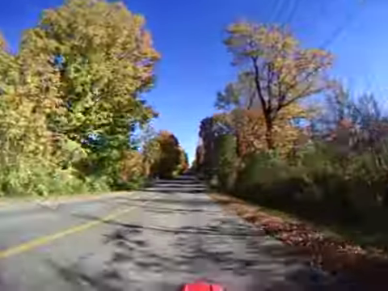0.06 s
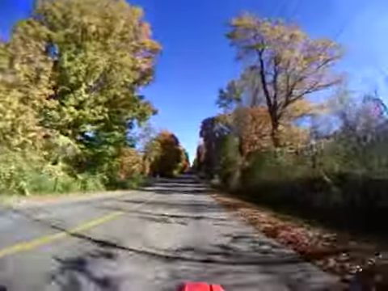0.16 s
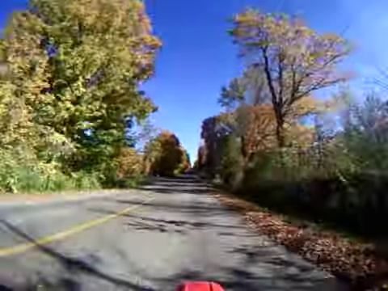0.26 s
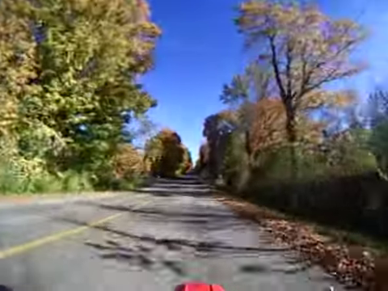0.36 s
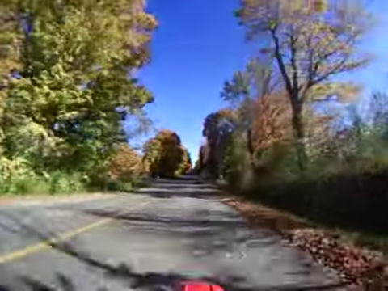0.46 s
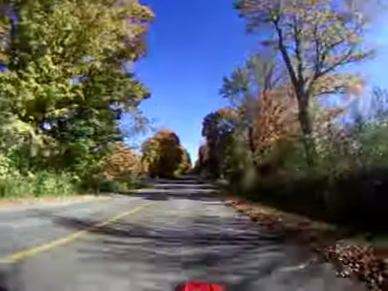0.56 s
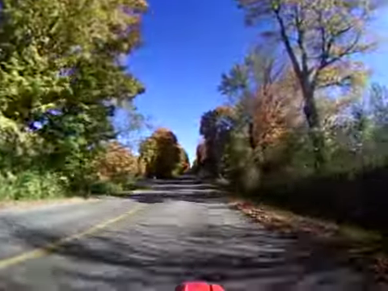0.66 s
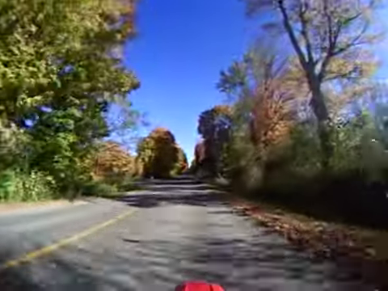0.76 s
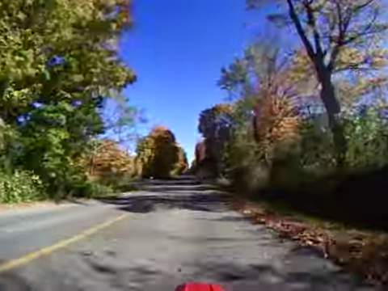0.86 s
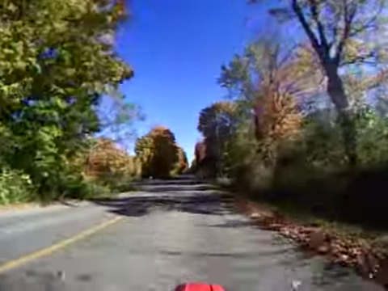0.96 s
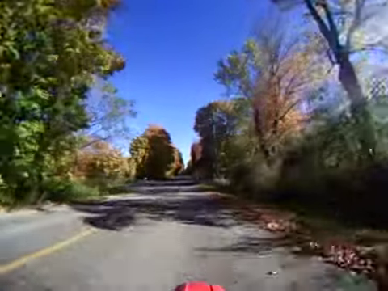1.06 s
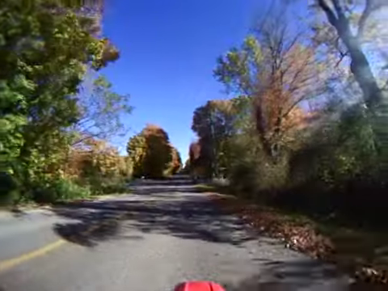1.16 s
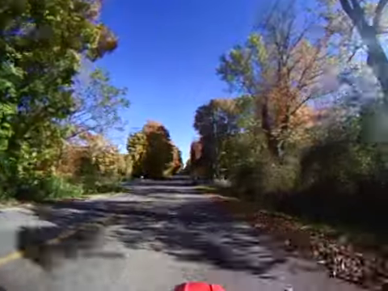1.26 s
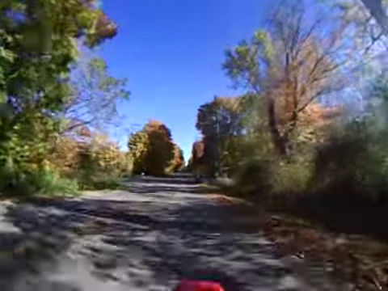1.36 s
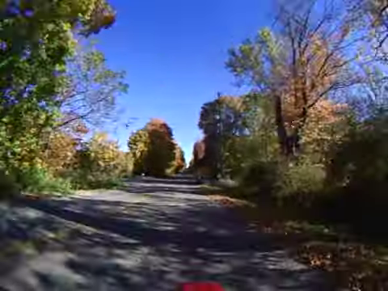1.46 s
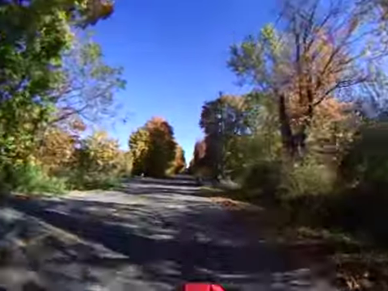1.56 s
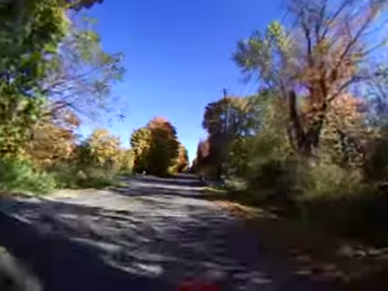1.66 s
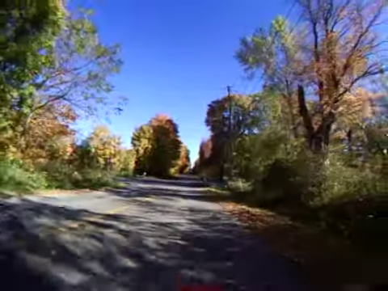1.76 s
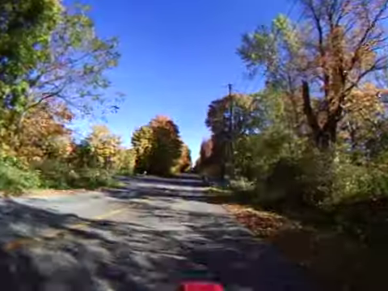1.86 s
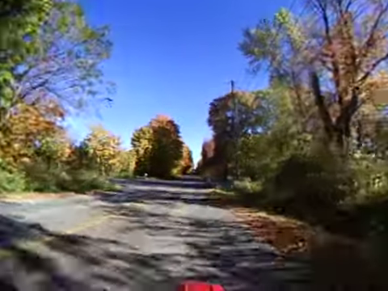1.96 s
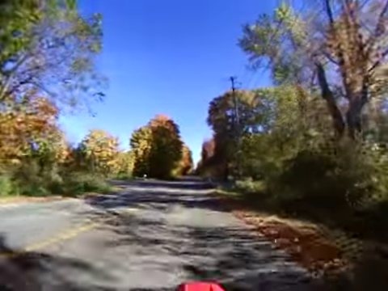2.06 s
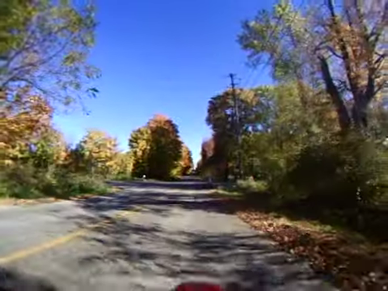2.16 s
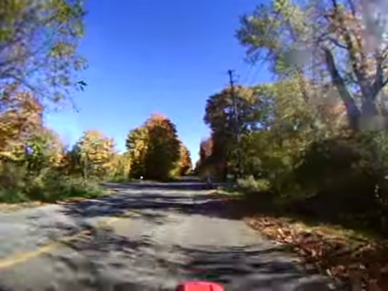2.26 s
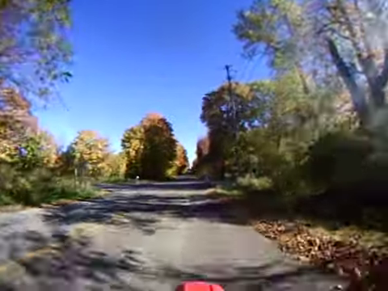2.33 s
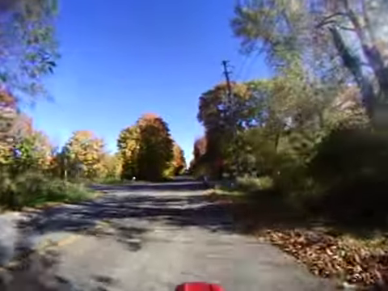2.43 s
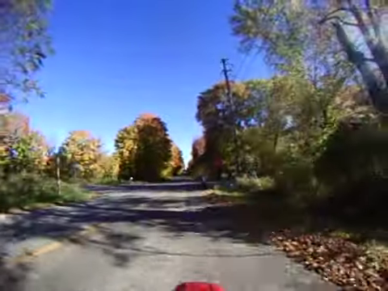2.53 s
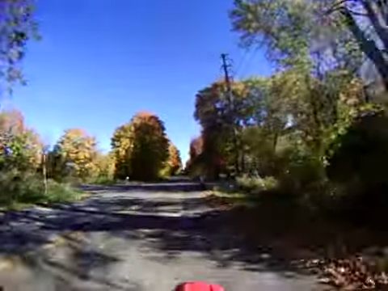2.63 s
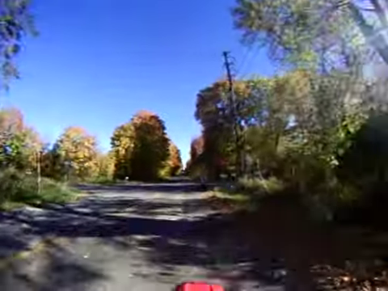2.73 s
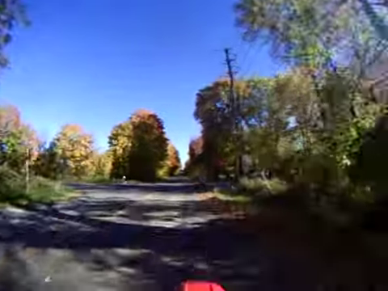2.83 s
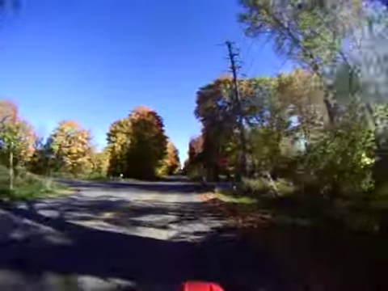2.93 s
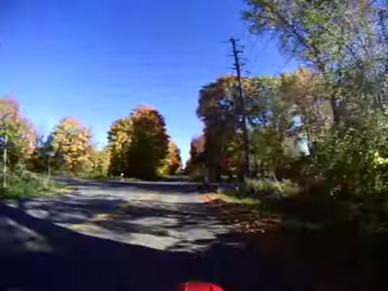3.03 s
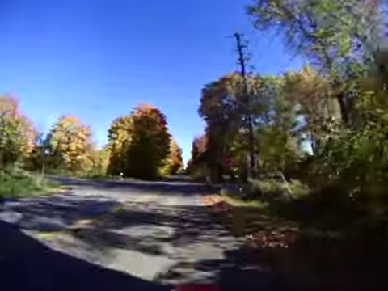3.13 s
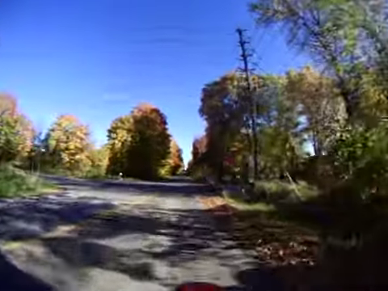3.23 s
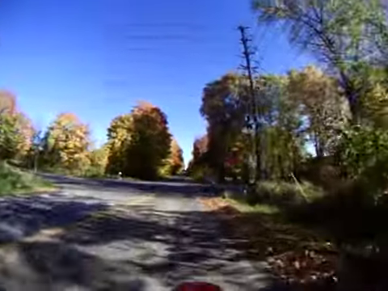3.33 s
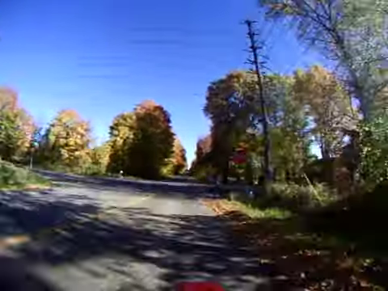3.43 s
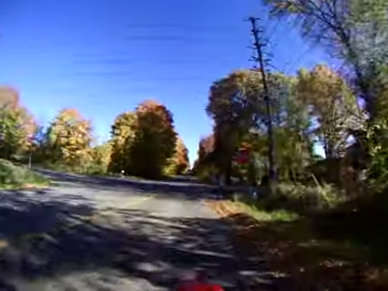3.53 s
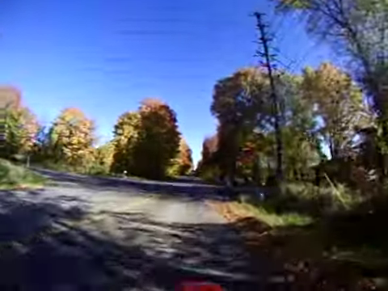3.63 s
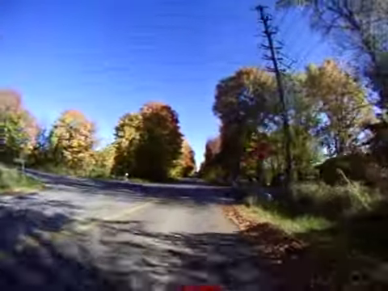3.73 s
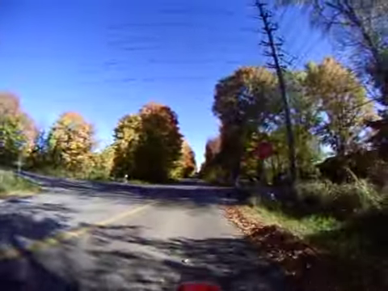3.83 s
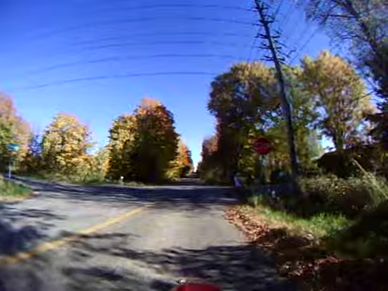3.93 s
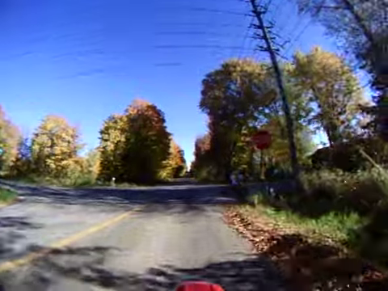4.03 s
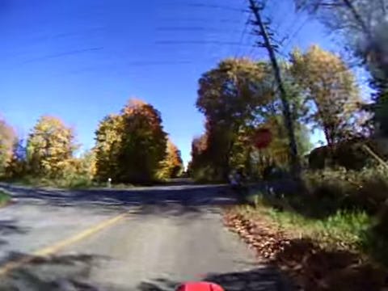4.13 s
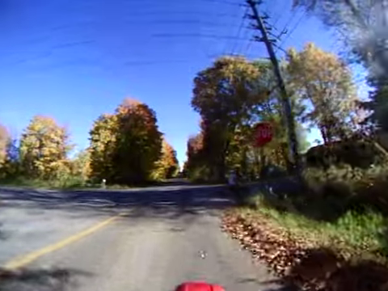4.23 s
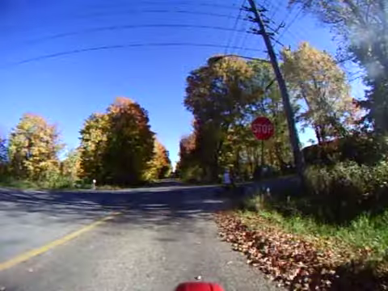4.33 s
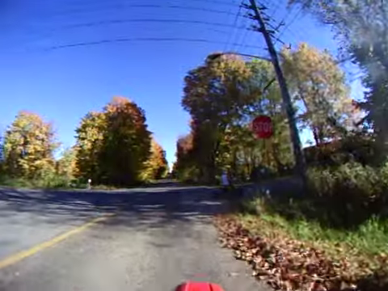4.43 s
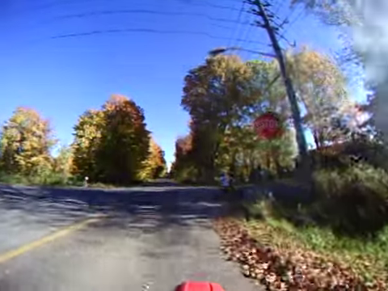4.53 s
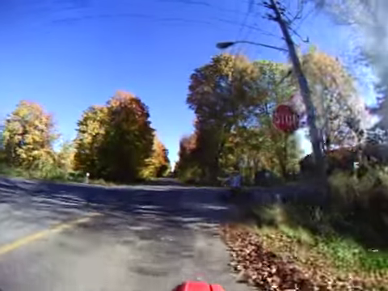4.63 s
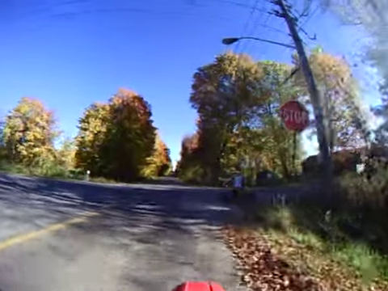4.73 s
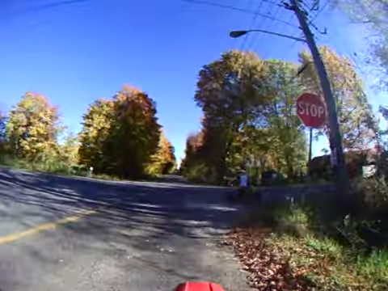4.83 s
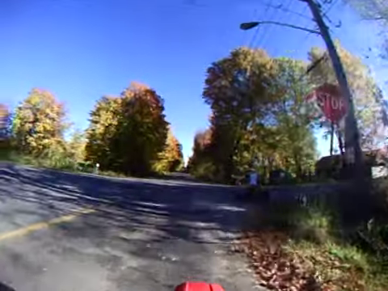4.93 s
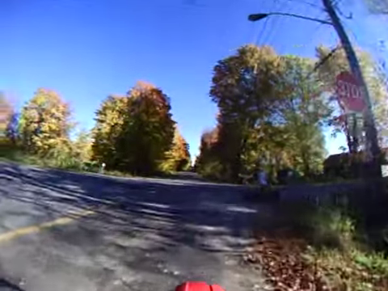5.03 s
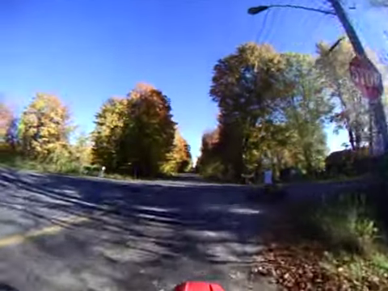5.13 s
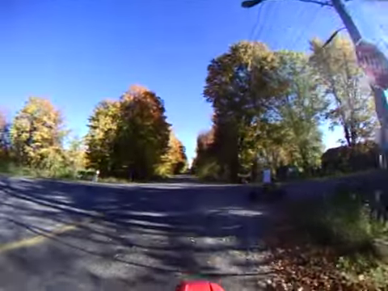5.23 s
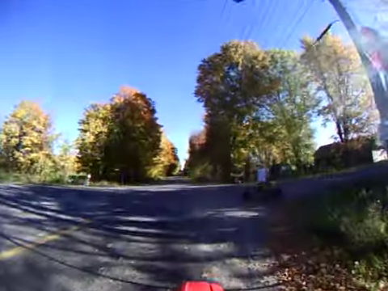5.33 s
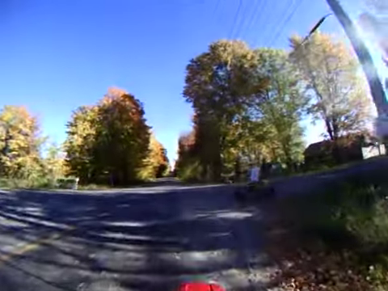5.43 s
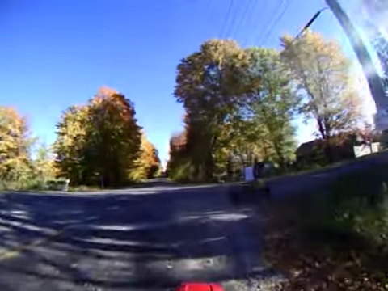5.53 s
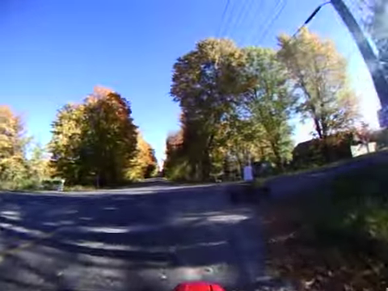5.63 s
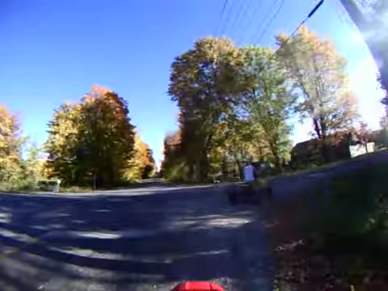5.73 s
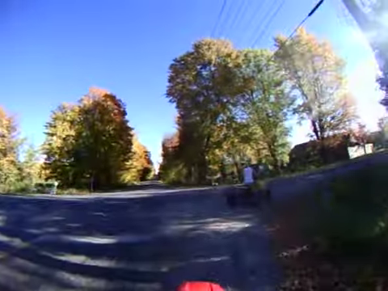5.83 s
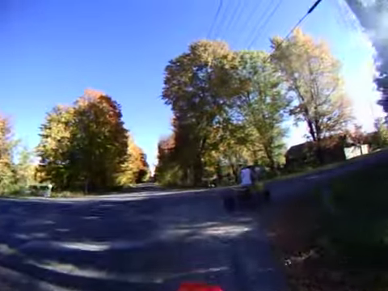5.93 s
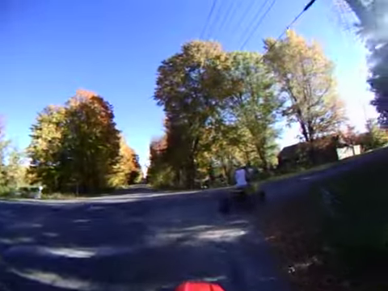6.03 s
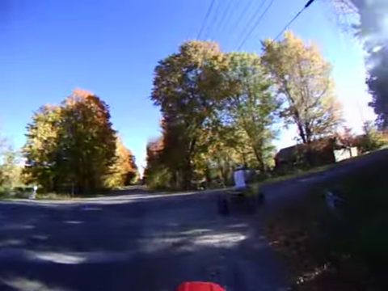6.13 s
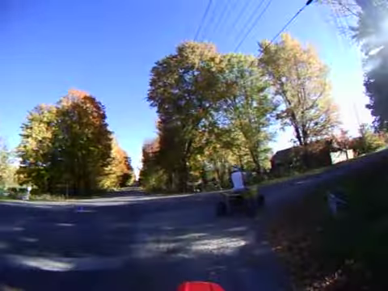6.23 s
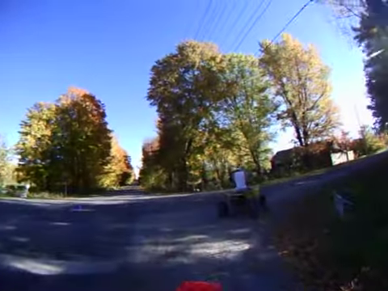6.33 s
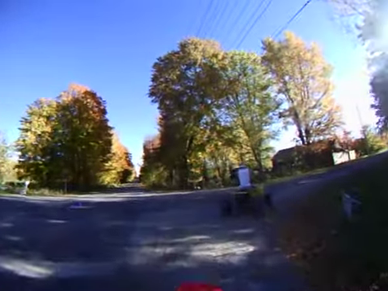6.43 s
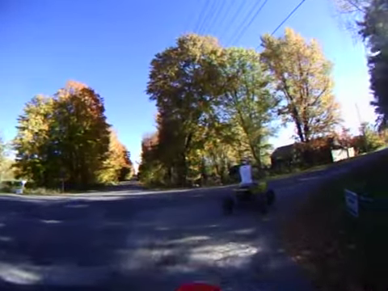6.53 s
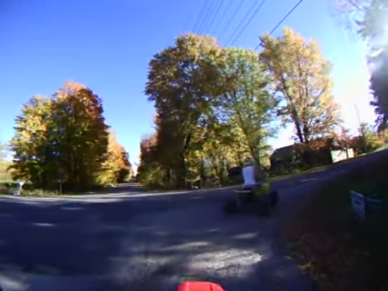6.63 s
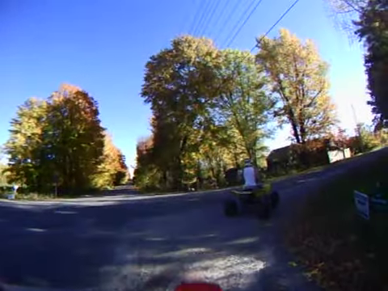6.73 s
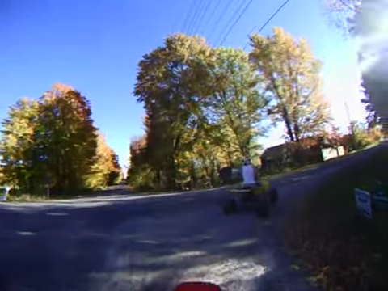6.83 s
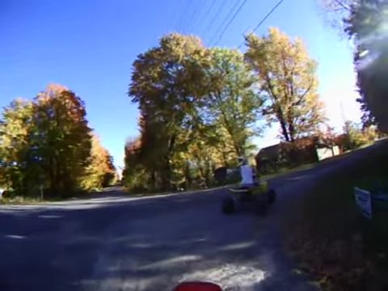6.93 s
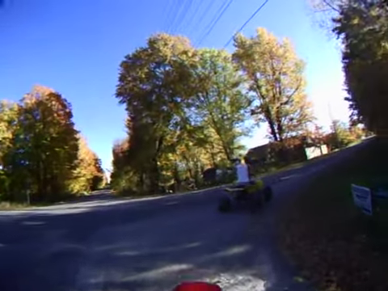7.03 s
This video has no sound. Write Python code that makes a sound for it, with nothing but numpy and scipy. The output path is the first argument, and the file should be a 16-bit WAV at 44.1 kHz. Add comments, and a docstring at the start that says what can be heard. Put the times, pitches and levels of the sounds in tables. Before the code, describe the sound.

Heard from on board, a dirt bike engine drones loudly and rasps as it overloads the microphone in two bursts of throttle. It then slows along the road, blipping twice with gear clacks and pipe pops, over faint low wind. The revs fall away to a soft, thumping idle with some chain rattle, before jumping sharply up again.

```python
"""Single-cylinder dirt bike, on board

Two hard pulls, two blips, a coast down to idle, a last stab. Engine speed and throttle drive the
airbox honk, silencer ring and engine clatter. The pipe pops, the gearbox clacks at each downshift,
the chain slaps at low speed. The honk overloads the narrow-band input of a small camera riding on
the bike, which rasps once or twice a crank turn."""
import sys
import numpy as np
from scipy import signal
from scipy.io import wavfile
from scipy.ndimage import uniform_filter1d

SR = 44100
rng = np.random.default_rng(int(sys.argv[2]) if len(sys.argv) > 2 else 0)


def file_out(sig):
    """Save sig as 16-bit WAV at sys.argv[1]."""
    # one column per channel
    cols = np.atleast_2d(sig).T
    # limit, then scale
    lim = np.clip(cols, -1, 1)
    pcm = np.round(lim * 32767).astype(np.int16)
    wavfile.write(sys.argv[1], SR, pcm)


N = 312228
TIME_S = np.arange(N) / SR
# Silencer resonances. Each row: frequency in Hz, width in Hz, gain in dB.
SILENCER_MODES = [(82.5, 22, -18), (134.8, 43, -4.5), (237.45, 65, -1.5), (302, 35, -21.5)]


def intake(turns, honk_db):
    """Each soft gulp of air rings the airbox; the charge varies, so the honk is ragged."""
    gulps = -pulses(turns, phase=0, scatter_db=1.34, jitter_s=.00002)
    soft = butter(butter(gulps, 33, "low"), 33, "low")
    airbox = ring(soft, [(145, 21, 0)])
    ragged_db = .6 * slow_noise(25)
    return steady(airbox) * undb(honk_db + ragged_db)


def throttle():
    """Honk gain: each twist rises linearly, holds, then rolls off."""
    # Each row: opening time, rise time, easing time, fall time, all in seconds, honk level in dB.
    twists = [(-.2, .1, 0.28, 0.2, -1), (.4, 0.044, .51, 0.04, -7), (.55, 0.062, .66, .03, -9),
              (1.111, .1, 1.24, 0.21, -6), (1.26, .1, 1.73, .175, 1.5), (2.85, 0.078, 2.95, .03, -16.5),
              (2.95, 0.1, 3.15, 0.29, -21.5), (4.39, 0.058, 4.64, 0.037, -29), (6.9, .14, 9.2, 0.075, -21)]
    honk = np.full(N, 1e-4)
    for opens_s, rise_s, eases_s, fall_s, db in twists:
        rise = np.clip((TIME_S - opens_s) / rise_s, 0, 1)
        fall = np.exp(-(np.maximum(TIME_S - eases_s, 0) / fall_s) ** 2)
        honk = np.maximum(honk, undb(db) * rise * fall)
    return honk


def engine_speed():
    """Engine pitch in Hz (crank turns per second): jumps at each downshift, sags while coasting."""
    # In gear, then clutch in. Each row: time in seconds, engine pitch in Hz.
    in_gear = [(0.0, 89.2), (0.21, 88.3), (0.63, 79.94), (0.78, 78.55), (1.05, 72.64), (1.14, 81.36),
               (1.52, 88.33), (2.59, 69.9), (2.8, 65.22), (2.89, 76.23), (2.93, 79.5), (3.17, 79.16),
               (3.43, 74.72), (4.33, 57.2), (4.45, 76.63), (4.48, 80.0), (4.54, 75), (5.4, 41.77)]
    clutch_in = [(5.502, 37), (5.8, 31), (6.197, 25), (6.898, 17), (7.002, 11), (7.08, 89)]
    return curves(list(in_gear) + list(clutch_in), TIME_S)[0]


def exhaust(turns, engine_hz, level_db):
    """Uneven exhaust beats and turbulent gas ring the silencer; the gas share grows at low revs."""
    beats = steady(pulses(turns, phase=.56, scatter_db=3.0, jitter_s=.0001))
    beats *= 1 + .45 * np.cos(np.pi * (turns - .56))  # strong and weak beats alternate
    gas = (25 / engine_hz) ** 2 * rng.standard_normal(N)
    flow = butter(beats + gas, 262, "low", order=10)
    return steady(ring(flow, SILENCER_MODES)) * undb(level_db + 1.77)


def bark(honk, max_db=11, halfway_honk_db=-18, linger_s=0.093):
    """Silencer boost in dB on throttle; lingers after the throttle eases."""
    fuel = np.maximum(honk, butter(honk, 1 / (2 * np.pi * linger_s), "low"))
    return max_db * fuel / (fuel + undb(halfway_honk_db))


def crank(turns, engine_hz, level_db):
    """The piston pumps twice a turn: a wavering hum that breaks into rumble at low revs."""
    waver_db = 1.4 * slow_noise(40)
    hum = np.sqrt(2) * np.cos(4 * np.pi * (turns - .57)) * undb(waver_db)
    hum -= undb(-18 + 2 * waver_db) * np.sin(2 * np.pi * turns)  # unequal strokes
    band = [(130, 390, 0)]
    rumble = steady(ring(ring(rng.standard_normal(N), band), band))
    hum_share = 1 / (1 + (49 / engine_hz) ** 16)
    # the frame shakes as the revs pass its resonance
    shake = np.sin(2 * np.pi * turns) * undb(-25) / (1 + ((engine_hz - 46) / 6) ** 4)
    return (hum_share * hum + (1 - hum_share) * rumble) * undb(level_db) + shake


def clatter(turns, engine_hz, level_db):
    """One knock a turn, harder with revs, and a rustle of valves and gears ring the case."""
    # Case and frame resonances. Each row: frequency in Hz, width in Hz, gain in dB.
    case_modes = [(562.5, 18, 6), (622.9, 70, 6), (712.7, 70, 0.5), (904, 96, -7.5), (1190.5, 220, -0.5),
                  (1291, 89, -2.5), (1519, 95, -6), (2011, 590, -4), (2287, 140, -2.5), (2523, 120, -2.5),
                  (2909, 140, -0.5), (3040, 38, -13.5), (3444, 480, -3)]
    knocks = steady(pulses(turns, phase=.6, scatter_db=-0.5, jitter_s=.00004)) * engine_hz / 70
    swell_db = 1.5 * np.cos(4 * np.pi * turns) + 1.9 * np.cos(2 * np.pi * (turns - .7))
    rustle = unit(rng.standard_normal(N) * undb(swell_db))
    drive = 1.4 * butter(knocks, 850, "low") + 0.98 * rustle
    body = butter(ring(drive, case_modes), 455, "high", order=3)
    # slow parts strike softly: less treble towards idle
    dull = np.clip(1 - engine_hz / 60, 0, 1)
    body += 5.9 * dull * butter(body, 520, "low")
    return steady(body) * undb(level_db + 6.5 + 2.0 * dull)


def exhaust_pops():
    """Sharp cracks from the pipe as the throttle opens."""
    # Each row: start in seconds, relative level in dB.
    pops = [(1.094, -5.5), (1.12, -10), (1.148, -12.5), (2.828, -10.5), (2.882, -11.5), (2.909, -15.5),
            (4.347, -14.5), (4.379, -11.5), (4.408, -9), (4.437, -15.5), (6.927, -20.5), (6.988, -14.5),
            (7.029, -14.5)]
    # Each row: frequency in Hz, width in Hz, gain in dB.
    crack_modes = [(143, 120, -12.5), (598, 140, 9.5), (1210, 220, 3.5), (1720, 900, -11), (2410, 960, -12),
                   (3170, 880, -13.5)]
    return undb(-4.0) * bursts(pops, crack_modes, rise_s=0.0012, decay_s=0.0079)


def idle_thumps():
    """Dull single firings ring the silencer at low revs."""
    # Each row: start in seconds, relative level in dB.
    thumps = [(5.435, -13.5), (5.486, -18), (5.924, -19), (6.156, -21), (6.758, -18.5), (6.916, -13),
              (6.985, -9), (7.03, -9.5)]
    ringing = bursts(thumps, SILENCER_MODES, rise_s=0.0016, decay_s=0.0063)
    return undb(-3.5) * butter(ringing, 289.4, "low", order=4)


def gear_clacks():
    """Gear changes ring the gearbox."""
    # Each row: start in seconds, relative level in dB.
    clacks = [(1.0095, -14), (1.0375, -10.5), (2.7432, -12.5), (4.2935, -16.5), (4.3171, -9.5)]
    # Each row: frequency in Hz, width in Hz, gain in dB.
    gearbox_modes = [(1250, 320, -5.5), (2356.4, 200, -1.5), (2925.6, 350, -1.5), (3290, 290, -4.5)]
    return undb(-2.5) * bursts(clacks, gearbox_modes, rise_s=0.0037, decay_s=0.0066)


def chain_slaps():
    """Slaps at low speed ring the chain and its guide."""
    # Each row: start in seconds, relative level in dB.
    slaps = [(4.6957, -20), (4.892, -23), (5.8676, -23), (6.0462, -28.5), (6.095, -31.5), (6.5125, -31.5),
             (6.6019, -29), (6.6962, -16.5), (6.8548, -32.5)]
    # Each row: frequency in Hz, width in Hz, gain in dB.
    chain_modes = [(1200, 280, -7), (2320, 520, -2.5), (2450, 73, -5.5), (2960, 360, -9.5),
                   (3244, 31, -1.5)]
    return undb(-3) * bursts(slaps, chain_modes, rise_s=.002, decay_s=.004)


def wind(clatter_db):
    """Low air buffeting; rises and falls with the revs, via the clatter level."""
    air = butter(rng.standard_normal(N), 76, "low", order=2)
    return unit(butter(air, 12, "high")) * undb(-16.5 + .5 * clatter_db)


def pulses(turns, phase, scatter_db, jitter_s):
    """One pulse per crank turn at the given phase (0 to 1), random in size and timing."""
    draws = rng.standard_normal((int(turns[-1]), 2))
    at_s = np.interp(np.arange(len(draws)) + phase, turns, TIME_S) + jitter_s * draws[:, 0]
    out = np.zeros(N)
    np.add.at(out, np.clip(at_s * SR, 0, N - 1).astype(int), undb(scatter_db * draws[:, 1]))
    return out


def bursts(events, modes, rise_s, decay_s):
    """A short noise push into resonances per event, scaled by its loudest 5 ms."""
    out, t = np.zeros(N + SR), TIME_S[:SR // 8]
    for start_s, db in events:
        push = rng.standard_normal(len(t)) * (1 - np.exp(-t / rise_s)) * np.exp(-t / decay_s)
        hit = ring(push, modes)
        peak_rms = np.sqrt(np.max(uniform_filter1d(hit ** 2, size=SR // 200)))
        out[int(start_s * SR):][:len(t)] += undb(db) * hit / peak_rms
    return out[:N]


def ring(x, modes):
    """Parallel resonators. Each mode: frequency in Hz, width in Hz, gain in dB."""
    return sum(undb(db) * signal.lfilter(*signal.iirpeak(hz, hz / width_hz, fs=SR), x)
               for hz, width_hz, db in modes)


def butter(x, hz, kind, order=1):
    """Low-pass or high-pass."""
    return signal.sosfilt(signal.butter(order, hz, kind, fs=SR, output="sos"), x)


def slow_noise(cutoff_hz):
    """Low-passed noise, rms 1."""
    return unit(butter(rng.standard_normal(N), cutoff_hz, "low", order=2))


def steady(x):
    """Hold the running rms at 1."""
    size = SR // 8
    power = uniform_filter1d(uniform_filter1d(x * x, size), size // 2)
    return x / np.sqrt(power + 1e-18)


def unit(x):
    """Scale to rms 1."""
    return x / np.std(x)


def undb(db):
    """Decibels to gain."""
    return 10 ** (np.asarray(db) / 20)


def curves(rows, at):
    """Interpolate a table's other columns along its first."""
    key, *columns = np.transpose(rows)
    return [np.interp(at, key, column) for column in columns]


def scene():
    """Engine parts locked to the crank, plus timed hits and wind."""
    # Throttle shut. Each row: engine pitch in Hz, relative crank, exhaust and clatter levels in dB.
    levels_by_speed = [(20, -42, -35.5, -47), (37, -53, -30, -42), (52.5, -28.5, -24.5, -38.5),
                       (67.4, -14.5, -23.5, -34), (78, -14, -21, -30)]
    takeover_db, load_clatter_db = -6.5, 7
    engine_hz, honk = engine_speed(), throttle()
    turns = np.cumsum(engine_hz) / SR
    crank_db, exhaust_db, clatter_db = curves(levels_by_speed, engine_hz)
    # above the takeover level the airbox displaces crank and silencer
    off_load = 1 / (1 + (honk / undb(takeover_db)) ** 3)
    surge_db = 2.5 * np.tanh(slow_noise(cutoff_hz=7))  # uneven burning
    engine = off_load * crank(turns, engine_hz, crank_db)
    engine += off_load * exhaust(turns, engine_hz, exhaust_db + bark(honk) + surge_db)
    engine += intake(turns, 20 * np.log10(honk))
    engine += clatter(turns, engine_hz, clatter_db + load_clatter_db * (1 - off_load))
    hits = exhaust_pops() + idle_thumps() + gear_clacks() + chain_slaps()
    return (engine + hits + wind(clatter_db))[None]


def record(dry):
    """A narrow-band microphone saturates, its flat tops droop, converter overflows drop to zero."""
    rail, bias, overflow, ceiling, leak = .73, .1, .72, .715, .14
    converter_hz, top_hz = 8000, 15800
    narrow = signal.fftconvolve(dry[0], signal.firwin(601, 3440, fs=SR), "same")
    saturated = np.clip((1 - leak) * narrow + leak * dry[0] + bias, -rail, rail) - bias
    drooped = butter(saturated, 84, "high")
    samples = signal.resample_poly(drooped, converter_hz, SR)
    samples *= np.abs(samples) < overflow
    upsampled = butter(signal.resample_poly(samples, SR, converter_hz)[:N], 3, "high")
    smooth = signal.fftconvolve(upsampled, signal.firwin(201, 4250, fs=SR), "same")
    # gap edges overshoot and hit the ceiling: a thin rasp in the top octaves
    rasping = np.clip(smooth, -ceiling, ceiling)
    lowpass = signal.ellip(8, .1, 70, top_hz, fs=SR, output="sos")
    return signal.sosfilt(lowpass, rasping)[None]


dry = scene()
out = record(dry)
file_out(out)
```